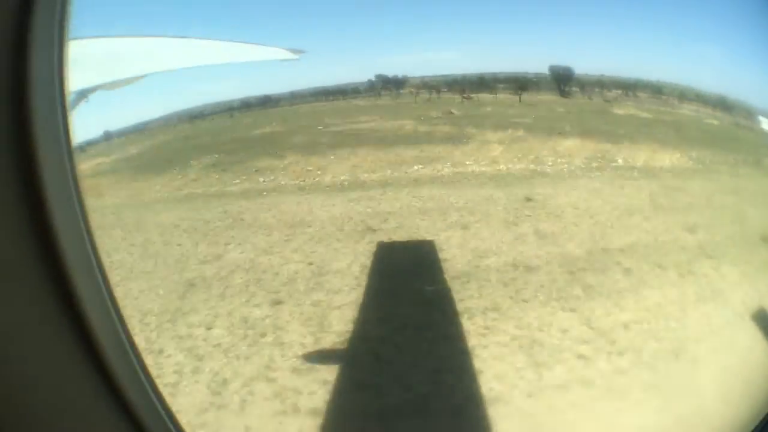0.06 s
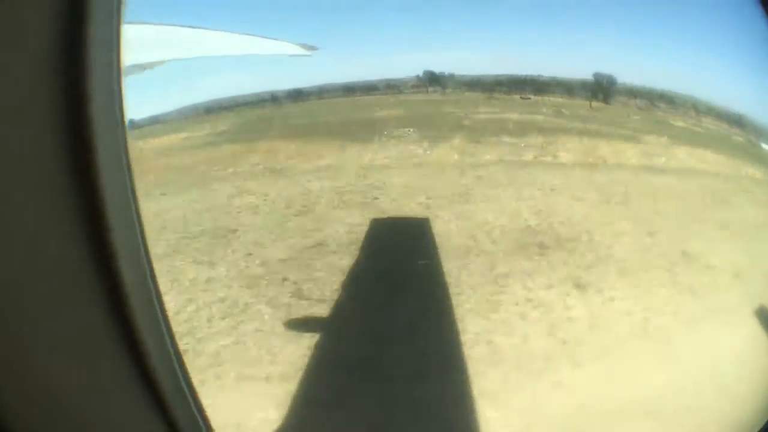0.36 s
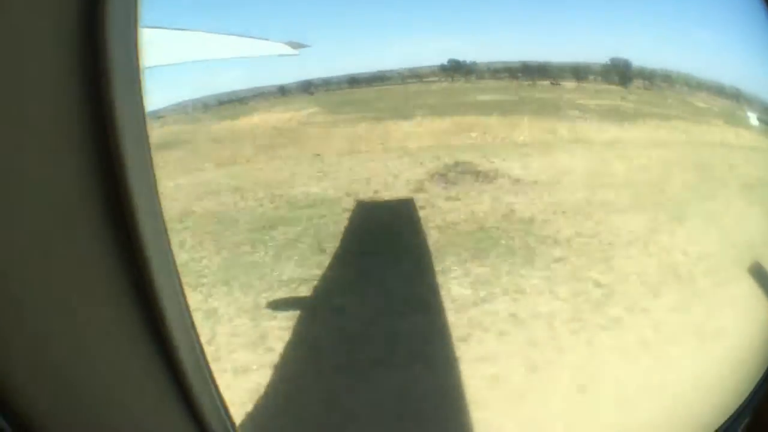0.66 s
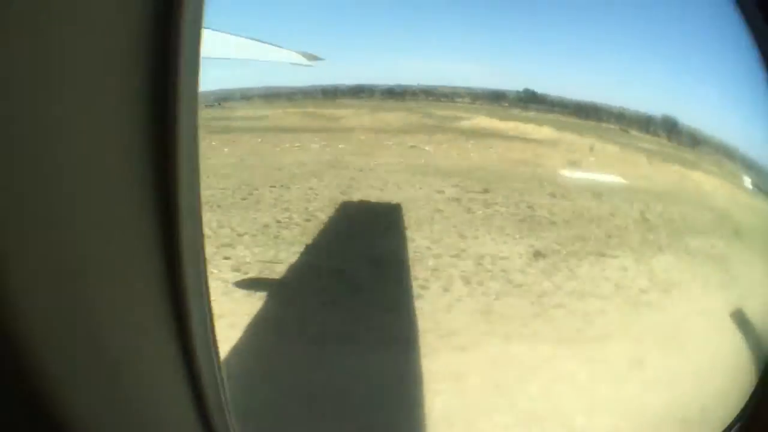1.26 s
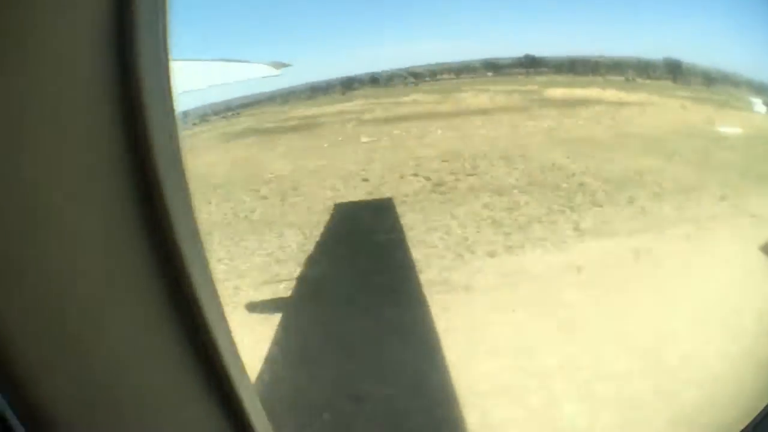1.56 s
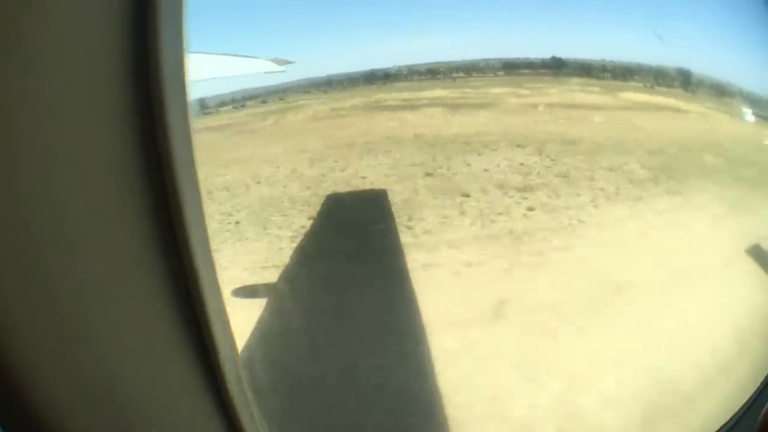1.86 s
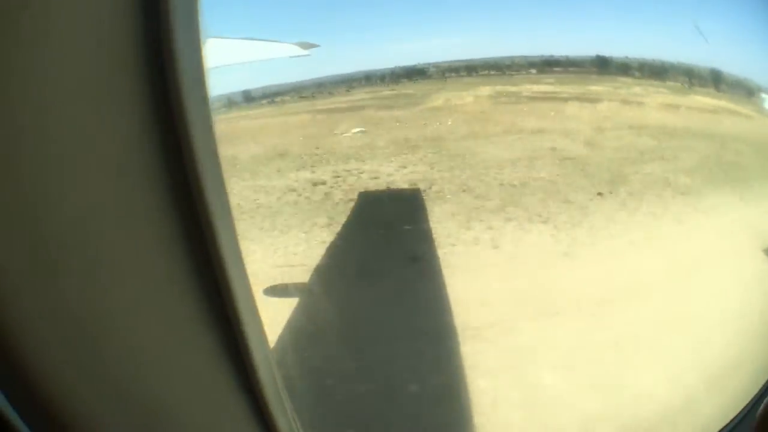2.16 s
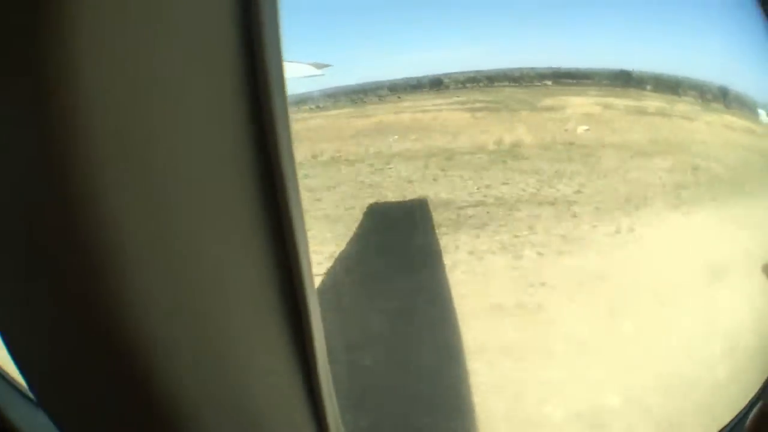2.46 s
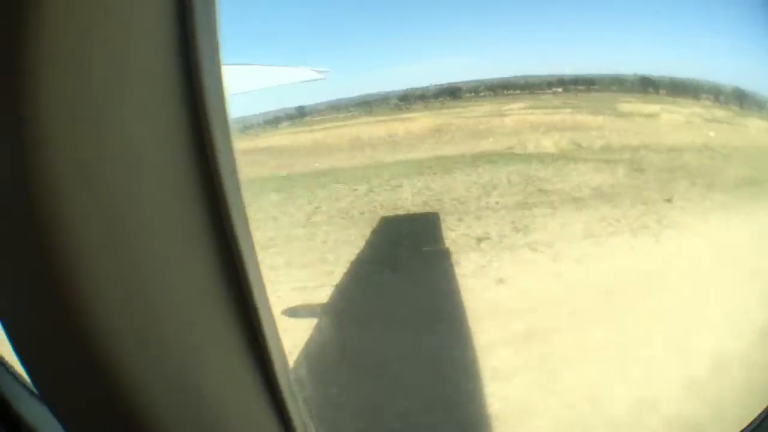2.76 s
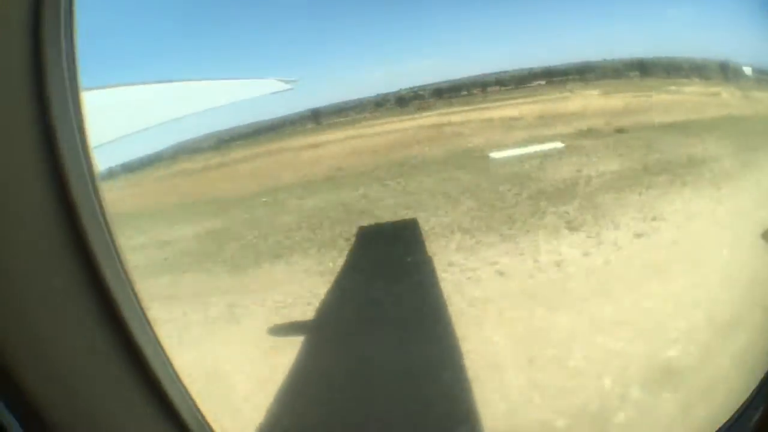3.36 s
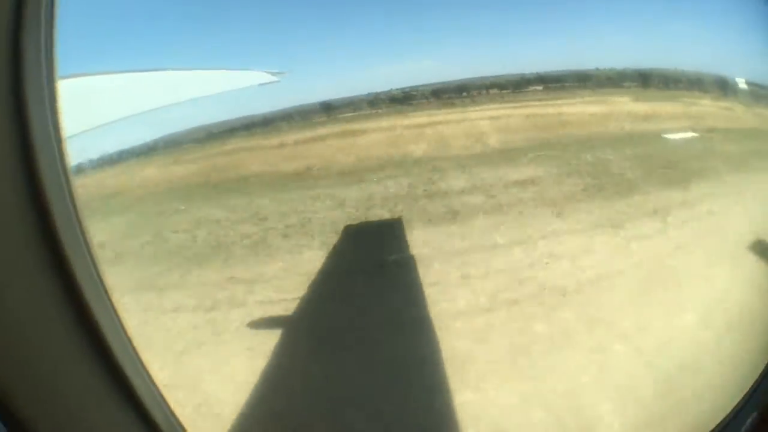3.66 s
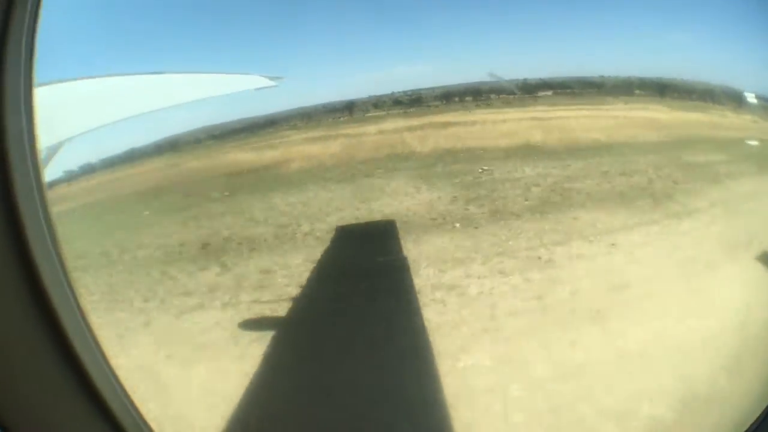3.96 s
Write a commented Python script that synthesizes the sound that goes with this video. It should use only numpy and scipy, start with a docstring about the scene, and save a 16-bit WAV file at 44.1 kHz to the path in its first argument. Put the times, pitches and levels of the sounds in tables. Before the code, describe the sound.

Cabin rumble of a small plane touching down, with propeller drone and fading rushing air.

```python
"""Inside a small plane landing on a dirt strip, one microphone at the window seat.
First the idling propeller drones under a loud rush of air, with buffeting and a faint engine whine.
At about 1.1 s the wheels touch, and the rough ground sets the cabin booming and rattling.
Tiny squeaks and ticks follow as the cabin flexes. From 1.5 s the tyre hum swells and sinks in pitch,
while the rush fades and dulls as the plane slows."""
import sys
import numpy as np
from scipy import signal
from scipy.fft import rfft, irfft
from scipy.io import wavfile
from scipy.ndimage import uniform_filter1d, minimum_filter1d

SR = 44100
rng = np.random.default_rng(int(sys.argv[2]) if len(sys.argv) > 2 else 0)


def wav_record(signal):
    """Record a signal, one row per channel, as 16-bit PCM in the file named by sys.argv[1]."""
    frames = np.transpose(np.atleast_2d(signal))
    bounded = np.clip(frames, -1, 1)
    # unit amplitude maps onto the largest positive 16-bit level
    quanta = np.round(bounded * 32767).astype(np.int16)
    wavfile.write(sys.argv[1], SR, quanta)


N = 176400
T = np.arange(N) / SR


def undb(db):
    """Decibels to gain."""
    return 10 ** (np.asarray(db) / 20)


def unit(x):
    """Scale to rms 1."""
    return x / np.sqrt(np.mean(x ** 2) + 1e-20)


def curve(table, column=1):
    """One column of a table, joined by straight lines in time."""
    rows = np.array(table, float)
    return np.interp(T, rows[:, 0], rows[:, column])


def noise(colour, low_cut_hz=0):
    """Noise with a (freq_hz, gain_db) colour that falls away beyond its ends."""
    f = np.arange(N // 2 + 1) * SR / N + 1e-3
    hz, db = np.array(colour, float).T
    ends = np.minimum(1, f / hz[0]) ** 2 * np.minimum(1, hz[-1] / f) ** 4
    gain = ends * undb(np.interp(np.log(f), np.log(hz), db))
    gain /= np.sqrt(1 + (low_cut_hz / f) ** 10)
    return unit(irfft(rfft(rng.standard_normal(N)) * gain, N))


def wander(rate_hz):
    """Smooth random wandering with spread 1."""
    f = np.arange(N // 2 + 1) * SR / N
    return unit(irfft(rfft(rng.standard_normal(N)) * np.exp(-.5 * (f / rate_hz) ** 2), N))


def phase_of(hz):
    """Phase of a steady or gliding frequency."""
    return 2 * np.pi * np.cumsum(hz * np.ones(N)) / SR


def rough_tone(hz, width_hz):
    """A narrow, unsteady resonance around a frequency."""
    phase = phase_of(hz)
    return wander(width_hz / 2) * np.cos(phase) + wander(width_hz / 2) * np.sin(phase)


def steady(x, span_s, share):
    """Even out a share of the slow swells of a noise."""
    power = uniform_filter1d(np.abs(signal.hilbert(x)) ** 2, int(span_s * SR))
    return unit(x / (power + 1e-9) ** (share / 2))


# Propeller, heard from inside: time_s, blade_rate_hz, level_db
PROPELLER = [(0,90,-22),(.22,89,-14),(.3,88.5,-27.5),(.5,88,-18.5),(.78,87.5,-21.5),(.95,84,-26),(1.4,76,-45),(2.3,73,-32.5),(4,68,-36)]
# Its partials: blade_rate_multiple, gain_db
BLADE_PARTIALS = [(1,-2),(2,-20.5),(3,-21.5)]


def propeller():
    """The passing blades make a wavering drone, with a lower engine hum beside it."""
    phase = phase_of(curve(PROPELLER) * (1 + .0057 * wander(5.7)))
    drone = sum(undb(db + 2.2 * wander(13)) * np.sin(k * phase) for k, db in BLADE_PARTIALS)
    engine_db = -31 + 2 * wander(12)
    engine_hz = 64.56 * (1 + .013 * wander(2.66))
    hum = undb(engine_db) * np.sin(phase_of(engine_hz))
    return np.sqrt(2) * (drone * undb(curve(PROPELLER, column=2)) + hum)


# Air just outside the window: time_s, level_db
RUSH_LEVEL = [(0,-38.5),(.35,-37),(.8,-35),(1.0,-33.5),(1.1,-33),(1.23,-40),(1.45,-41.5),(2.1,-44),(2.45,-47.5),(2.8,-50),(3.2,-51),(3.6,-49.5),(4,-51)]
# Its colour at speed and when slowed: freq_hz, gain_db
FAST_COLOUR = [(700,8.5),(830,0),(1160,.5),(1450,-2.5),(1750,-5),(1950,-6),(2210,-1.5),(2970,-7),(3400,-4),(4300,-5),(4900,-11.5),(5300,-7),(5870,-5),(6800,-12),(7600,-10),(8800,-10.5),(9500,-16.5),(10450,-28),(11200,-25),(13100,-25.5),(15400,-35)]
SLOW_COLOUR = [(700,-5.5),(850,-.5),(1150,0.5),(1400,-5.5),(1700,-2),(2250,-2),(3000,-8),(3600,-5.5),(4300,-6),(4930,-13.5),(5700,-7.5),(6200,-10.5),(6900,-14.5),(8600,-13.5),(9400,-21.5),(10500,-30),(11400,-28.5),(13300,-32),(15400,-42)]


def air_rush():
    """Air over the fuselage, fluttering, lightly chopped by the blades, duller as speed falls."""
    slowed = np.interp(T, [1.23, 2.6], [0, 1])
    fast = undb(1.4) * noise(FAST_COLOUR, low_cut_hz=755)
    slow = undb(2) * noise(SLOW_COLOUR, low_cut_hz=755)
    air = np.sqrt(1 - slowed) * fast + np.sqrt(slowed) * slow
    chop = 1 + .1 * np.sin(phase_of(curve(PROPELLER)))
    flutter_db = .61 * wander(110)
    return air * chop * undb(curve(RUSH_LEVEL) + flutter_db)


# Boom all around the microphone: time_s, level_db
BOOM_LEVEL = [(0.02, -20), (0.05, -22.5), (0.31, -20.5), (0.8, -17.5), (0.89, -22), (1.04, -19), (1.1, -12),
              (1.23, -11), (1.27, -29), (1.32, -16.5), (1.56, -19.5), (1.63, -40), (1.77, -14), (1.81, -26),
              (1.83, -13), (1.95, -25.5), (2.16, -18), (2.55, -24), (2.73, -15), (2.8, -28), (2.84, -23),
              (3.13, -17), (3.16, -35), (3.2, -15), (3.25, -22), (3.98, -18.5)]
# Its colour in the air and on the strip: freq_hz, gain_db
BUFFET_COLOUR = [(18,-30),(30,-6),(45,6),(58,15.5),(75,0.5),(105,20.5),(125,8),(150,-15),(200,-28)]
ROLLING_COLOUR = [(18,-31),(30,-15.5),(42,-2),(52,-2.5),(64,0.5),(85,7),(110,10.5),(128,3),(146,0),(175,-25),(230,-45)]


def cabin_boom():
    """Low cabin resonances, driven by buffeting, then by the rolling wheels, which wake a narrow ring."""
    touch_s, rise_s = 1.04, .099
    landed = np.clip((T - touch_s) / rise_s, 0, 1)
    buffet = undb(-3) * steady(noise(BUFFET_COLOUR), span_s=.083, share=1)
    rolling = noise(ROLLING_COLOUR) + undb(-5) * rough_tone(hz=126.3, width_hz=7)
    ground = undb(.5) * steady(rolling, span_s=.087, share=.85)
    return (np.sqrt(1 - landed) * buffet + np.sqrt(landed) * ground) * undb(curve(BOOM_LEVEL))


# Airframe and panels around the seat: time_s, frame_db, panel_db
SHAKE_LEVELS = [(0.03, -30, -40), (0.24, -30.5, -39), (0.28, -28, -38.5), (0.97, -29, -37),
                (1.16, -19.5, -30.5), (1.19, -23.5, -38), (1.66, -31.5, -43), (1.76, -26.5, -38),
                (2.21, -27, -42), (2.3, -24.5, -39.5), (2.44, -31.5, -42), (2.51, -26.5, -45),
                (2.59, -30, -45), (3.21, -31, -44.5), (3.29, -32, -48.5), (3.57, -28.5, -47.5),
                (3.91, -31.5, -49), (3.97, -29, -43.5)]
# Colour of the frame's rumble and the panels' rattle: freq_hz, gain_db
RUMBLE_COLOUR = [(120,1),(165,0),(200,1),(240,0.5),(275,-2),(310,-1.5),(350,-8),(410,-13.5),(480,-21),(650,-58)]
RATTLE_COLOUR = [(350,-23),(450,-12),(510,-1.5),(550,-4),(595,1.5),(670,0),(740,-5),(820,-11),(1000,-15.5),(1250,-16),(1600,-24),(2300,-25.5)]


def airframe_shake():
    """The shaken airframe rumbles and the panels rattle above it."""
    rumble = steady(noise(RUMBLE_COLOUR), span_s=.12, share=.68)
    rattle = noise(RATTLE_COLOUR)
    frame_db = curve(SHAKE_LEVELS) + .5
    panel_db = curve(SHAKE_LEVELS, column=2) + .66 + .74 * wander(32)
    return rumble * undb(frame_db) + rattle * undb(panel_db)


# Engine whine, faint at the seat: time_s, pitch_hz, level_db
ENGINE_WHINE = [(0,9030,-67),(1,8750,-58),(1.6,8700,-64),(2.6,8200,-81),(3.3,8400,-69.5),(3.7,8720,-69),(4,9000,-65)]


def engine_whine():
    """A thin, breathy engine whine that sinks and climbs again."""
    return rough_tone(curve(ENGINE_WHINE), width_hz=340) * undb(curve(ENGINE_WHINE, column=2))


# Wheel strikes under the floor: start_s, level_db
WHEEL_BLOWS = [(1.076,-18),(1.115,-12.5),(1.166,-22),(1.75,-30)]
# Cabin modes: pitch_hz, gain_db, t60_s
CABIN_MODES = [(68,-23,0.15),(112,9.5,0.15),(133,-0.5,0.13),(222,-6,0.17),(295,-8,0.13),(633,-22,0.071)]


def wheel_blows():
    """The wheels strike the ground and ring the cabin, a little differently in pitch each time."""
    out = np.zeros(N)
    for start_s, level_db in WHEEL_BLOWS:
        age = np.maximum(T - start_s, 0)
        for pitch_hz, gain_db, t60_s in CABIN_MODES:
            detuned_hz = pitch_hz * (1 + .04 * rng.standard_normal())
            envelope = undb(level_db + gain_db - 60 * age / t60_s)
            out += envelope * np.sin(2 * np.pi * detuned_hz * age)
    return signal.sosfilt(signal.butter(2, 50, "high", fs=SR, output="sos"), out)


# Trim near the microphone: start_s, pitch_hz, level_db
TRIM_SQUEAKS = [(1.212,10200,-55),(1.317,10050,-49),(2.622,14500,-61),(2.742,14050,-50.5),(2.853,13750,-57),(3.037,13900,-69),(3.147,13550,-73),(3.376,14000,-61)]


def trim_squeaks():
    """The trim gives tiny high squeaks as the cabin flexes."""
    rise_s = .0052
    out = np.zeros(N)
    for start_s, pitch_hz, level_db in TRIM_SQUEAKS:
        rises = np.maximum(T - start_s + rise_s / 2, 0) / rise_s
        envelope = undb(level_db) * rises * np.exp(1 - rises)
        out += envelope * rough_tone(pitch_hz, width_hz=400)
    return out


# Loose fittings close by: start_s, level_db
FITTING_TICKS = [(1.217,-51),(1.331,-46),(1.373,-51),(1.511,-56),(2.335,-57),(2.655,-61),(3.103,-63),(3.25,-63)]


def fitting_ticks():
    """Loose fittings tick, each a short burst of bright noise."""
    decay_s = .004
    crack = noise([(2000, -10), (8000, 0), (14000, -3), (15500, -14)], low_cut_hz=2000)
    out = np.zeros(N)
    for start_s, level_db in FITTING_TICKS:
        out += undb(level_db) * (T >= start_s) * np.exp(-np.abs(T - start_s) / decay_s) * crack
    return out


# Tyres, heard through the floor: time_s, pitch_hz, level_db
TYRE_HUM = [(1.5,283.6,-46.5),(1.8,260,-36),(2.1,228,-32.5),(2.35,203.3,-33.5),(2.55,188.2,-40),(2.8,166.3,-54)]


def tyre_hum():
    """Faint until 1.5 s, the hum of the slowing tyres swells and glides down over a deeper throb."""
    pitch_hz = curve(TYRE_HUM)
    hum = steady(rough_tone(pitch_hz, width_hz=11), span_s=.23, share=.73)
    throb = undb(7) * steady(rough_tone(.305 * pitch_hz, width_hz=6.8), span_s=.3, share=.7)
    return (hum + throb) * undb(curve(TYRE_HUM, column=2))


def scene():
    """Everything as heard from the window seat, in mono."""
    throughout = propeller() + air_rush() + cabin_boom() + airframe_shake() + engine_whine()
    return (throughout + wheel_blows() + trim_squeaks() + fitting_ticks() + tyre_hum())[None]


def record(dry):
    """After the microphone, a limiter holds the biggest peaks and the top treble is cut."""
    ceiling, window, top_hz = undb(-5.5), int(.005 * SR), 15650
    needed_gain = np.minimum(1, ceiling / (np.abs(dry) + 1e-9))
    gain = uniform_filter1d(minimum_filter1d(needed_gain, window), window)
    return signal.sosfilt(signal.ellip(10, .2, 80, top_hz, fs=SR, output="sos"), dry * gain)


dry = scene()
out = record(dry)
wav_record(out)
```